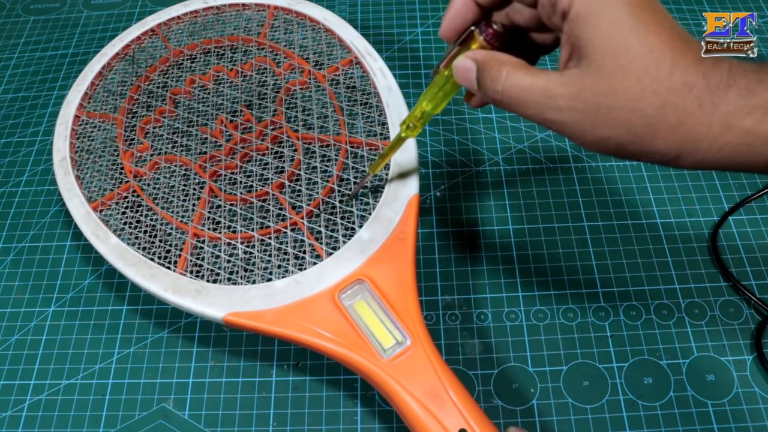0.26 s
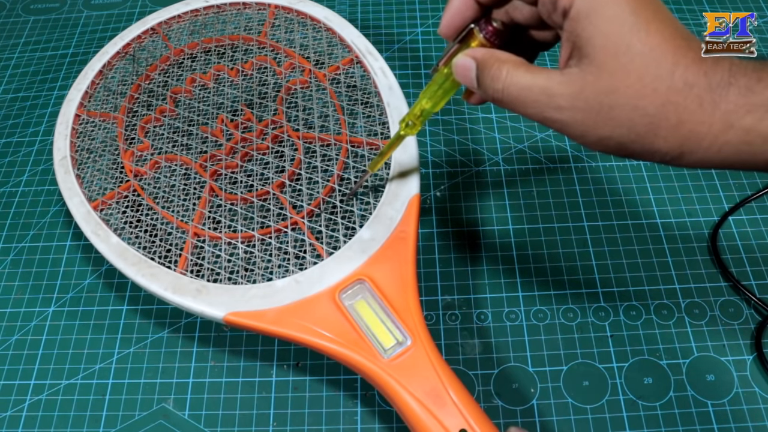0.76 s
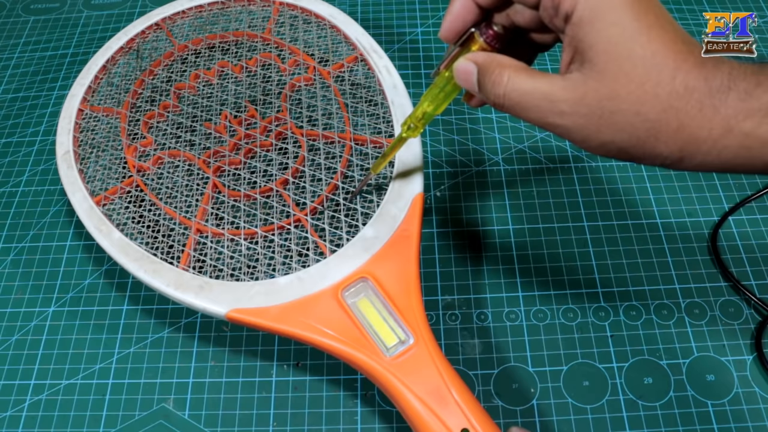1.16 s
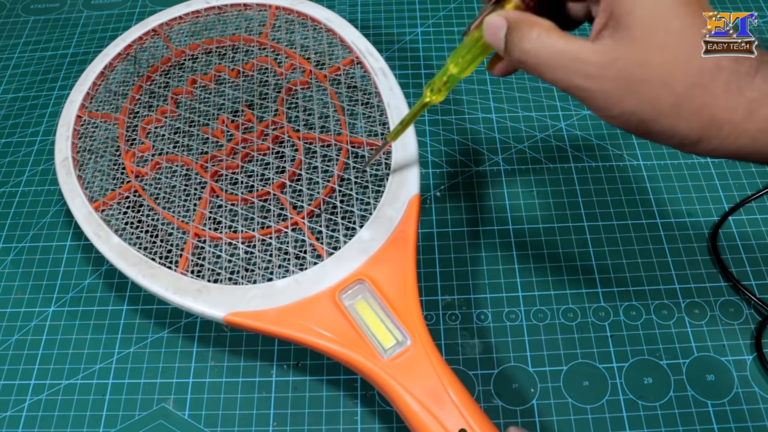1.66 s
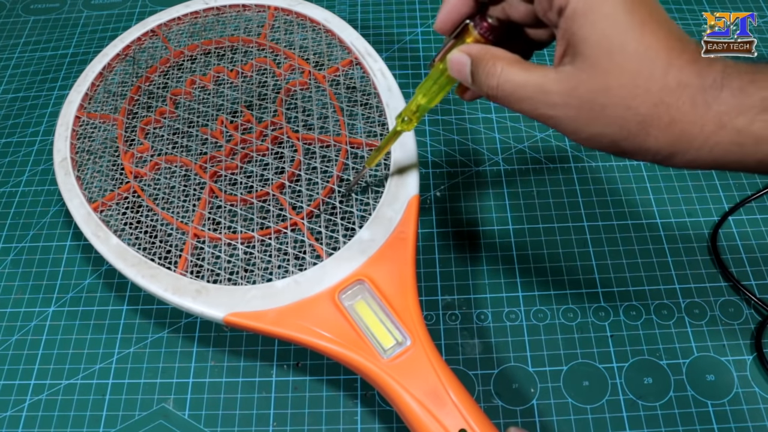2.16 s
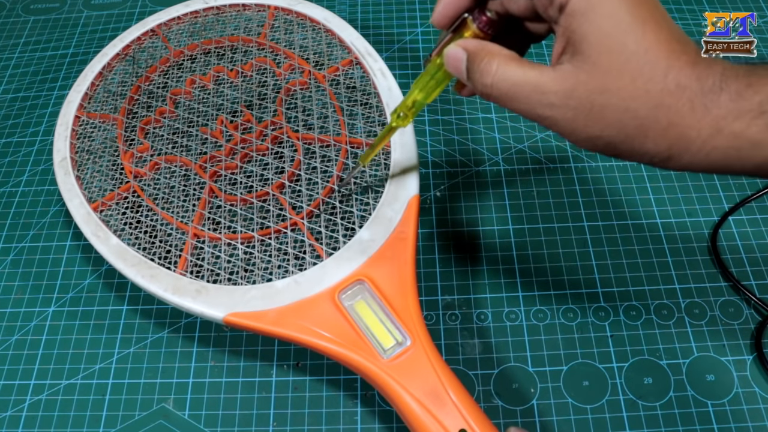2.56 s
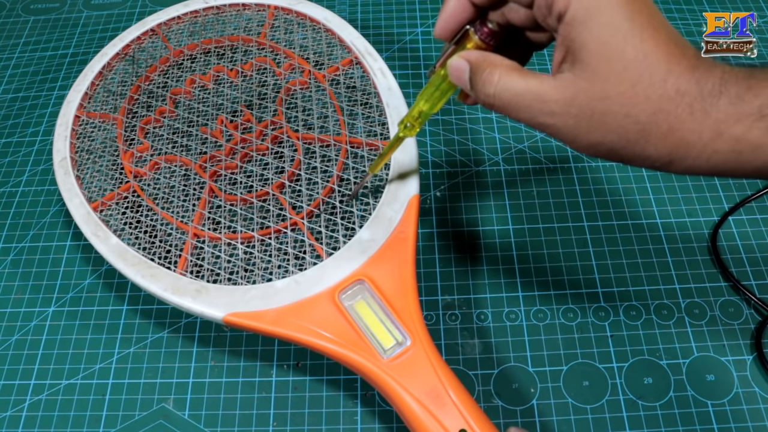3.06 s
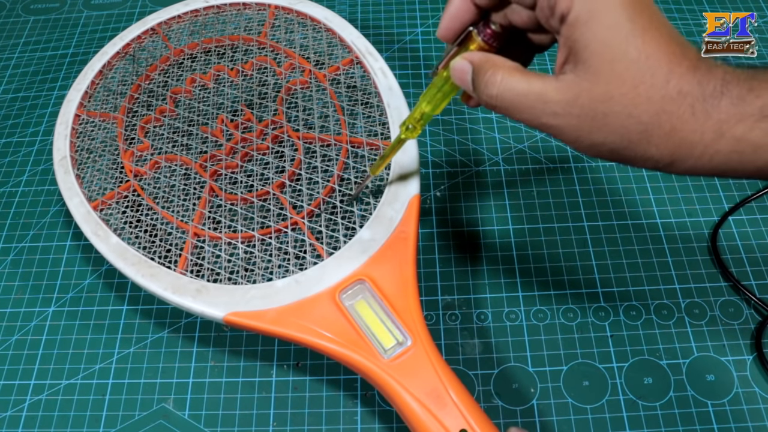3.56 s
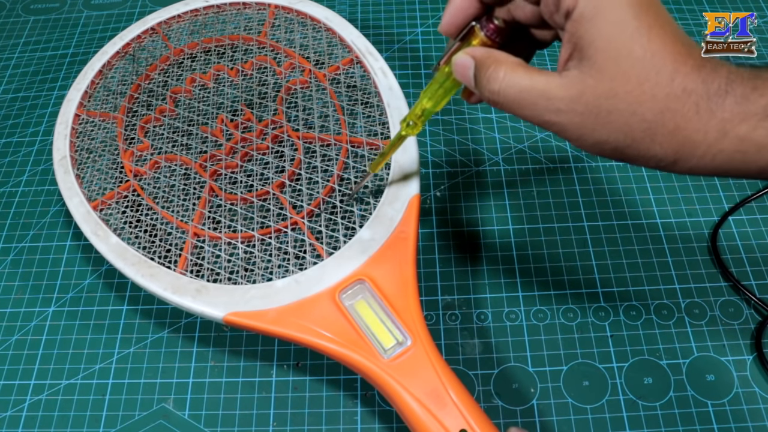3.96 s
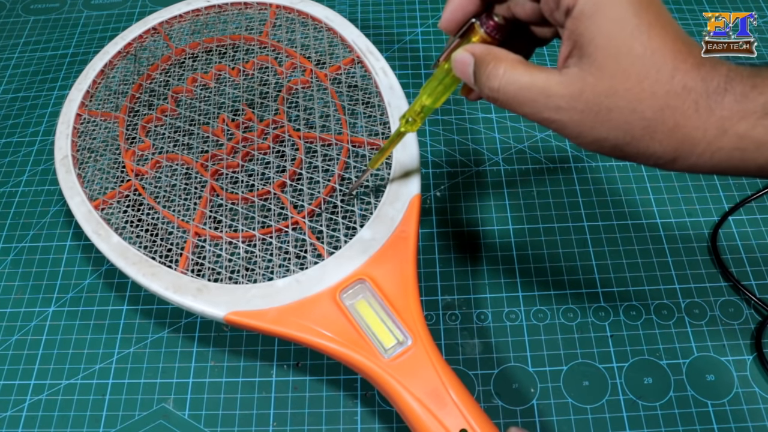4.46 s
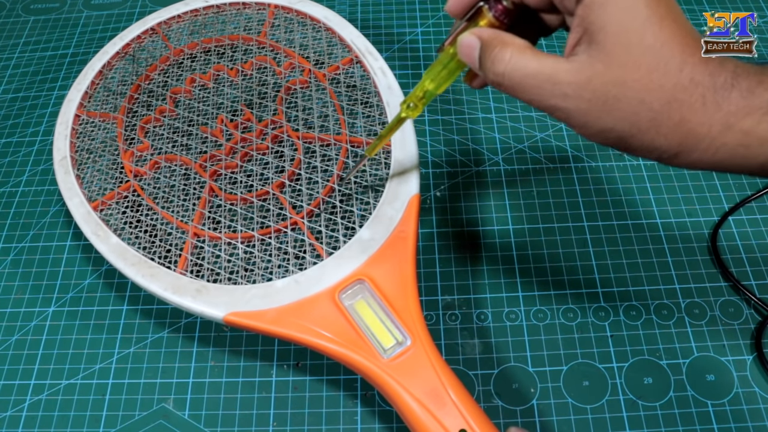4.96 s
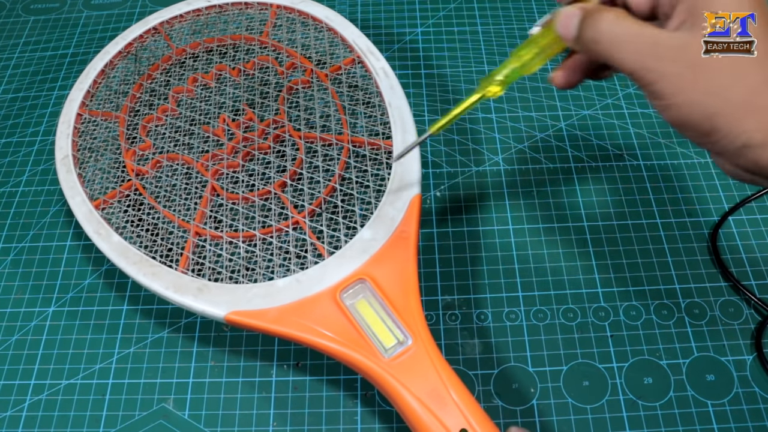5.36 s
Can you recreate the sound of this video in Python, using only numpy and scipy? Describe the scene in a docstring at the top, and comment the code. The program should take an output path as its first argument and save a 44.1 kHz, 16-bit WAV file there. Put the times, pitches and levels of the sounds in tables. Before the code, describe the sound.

An electric mosquito swatter snaps with loud single sparks and a quick crackling run as a screwdriver touches its mesh in a small room.

```python
"""A small bare room, a stereo microphone close to the charged mesh of an electric mosquito swatter.
A spark's tail dies away over low rumble, a far drone and hiss. A screwdriver tip ticks on the mesh and
shorts it at 0.5 s and 1.1 s: each spark is a pressure pop and a bright crack that overload the recorder,
whose limiter ducks and lets the room tail up. A run of small sparks follows until 1.4 s; the level sags
and slowly returns. Single sparks come at 2.5, 3.2 and 3.7 s, and a last cluster of three at 4.9 s."""
import sys
import numpy as np
from scipy import signal
from scipy.fft import rfft, irfft, next_fast_len
from scipy.io import wavfile
from scipy.ndimage import uniform_filter1d

SR = 44100
rng = np.random.default_rng(int(sys.argv[2]) if len(sys.argv) > 2 else 0)


def persist_wave(psi):
    """Save psi, clipped to +-1, as 16-bit WAV."""
    counts = np.round(np.clip(psi, -1, 1) * 32767).astype(np.int16)
    wavfile.write(sys.argv[1], SR, np.atleast_2d(counts).T)


N = 247392
LEAD = 4410   # samples before t = 0, where the first spark falls
LENGTH = N + LEAD
TIME = (np.arange(LENGTH) - LEAD) / SR


def amp(db):
    """Decibels to gain."""
    return 10 ** (np.asarray(db) / 20)


def rms_one(x):
    """Scale to rms 1."""
    return x / np.sqrt(np.mean(x ** 2) + 1e-20)


def in_time(rows):
    """Columns of a curve, one value per sample."""
    times, *columns = np.transpose(rows)
    return [np.interp(TIME, times, column) for column in columns]


def at_hz(points, hz, column=1):
    """Read a table on a log-frequency axis."""
    points = np.array(points)
    return np.interp(np.log(hz), np.log(points[:, 0]), points[:, column])


def sample_of(s):
    """Sample index of a time."""
    return round(s * SR) + LEAD


def add_at(out, s, sound):
    """Mix a stereo sound in at a time."""
    start = sample_of(s)
    out[:, start:start + sound.shape[1]] += sound


def butter(x, hz, kind="low", order=2):
    """Butterworth filter."""
    return signal.sosfilt(signal.butter(order, hz, kind, fs=SR, output="sos"), x)


def resonance(x, hz, width_hz):
    """Two-pole resonance."""
    r = np.exp(-np.pi * width_hz / SR)
    return signal.lfilter([1 - r, 0, r - 1], [1, -2 * r * np.cos(2 * np.pi * hz / SR), r * r], x)


def double_resonance(x, hz, width_hz):
    """Two equal resonances in series; rms 1."""
    return rms_one(resonance(resonance(x, hz, width_hz), hz, width_hz))


def pan(x, pan_db):
    """Spread a left-right difference over two channels."""
    return x * amp([[pan_db / 2], [-pan_db / 2]])


def swell(middle_s, length_s):
    """Bell-shaped swell."""
    return np.exp(-(2 * (TIME - middle_s) / length_s) ** 2)


# How alike the microphone's two sides hear the room: f/Hz, correlation
LIKENESS = [(60, 0.79), (380, 0.78), (950, 0.48), (2400, 0.017)]

def stereo_noise(spectrum):
    """Noise of a given spectrum whose channels are alike in the bass only; rms 1."""
    size = next_fast_len(LENGTH)
    hz = np.maximum(np.fft.rfftfreq(size, 1 / SR), 1)
    mid, side = rfft(rng.standard_normal((2, size)))
    alike = np.clip(at_hz(LIKENESS, hz), 0, 1)
    both = np.sqrt(1 + alike) * mid + np.sqrt(1 - alike) * side * [[1], [-1]]
    return rms_one(irfft(both * amp(at_hz(spectrum, hz)), size)[:, :LENGTH])


# A drone, far off: middle t/s, length/s, f/Hz, glide/(Hz/s), level/dB, octave level/dB
DRONE_SWELLS = [(2.896, 0.28, 365.3, -24, -64, -74), (4.584, 0.25, 393, 32, -62.5, -78)]

def far_drone():
    """A gliding tone and its octave swell twice, wavering with slow noise."""
    waver = rms_one(butter(rng.standard_normal((2, LENGTH)), hz=22))
    tone_gain, octave_gain = np.sqrt(2) * (1 + .5 * waver)
    out = 0
    for s, length, hz, glide, level_db, octave_db in DRONE_SWELLS:
        phase = 2 * np.pi * (hz * TIME + glide * (TIME - s) ** 2 / 2)
        tone = amp(level_db) * tone_gain * np.sin(phase)
        octave = amp(octave_db) * octave_gain * np.sin(2 * phase)
        out = out + swell(s, length) * (tone + octave)
    return out


# Spectra of the room tone's low, middle and high layers: f/Hz, relative density/dB
RUMBLE = [(15, -35), (25, -6.5), (48, -6.5), (76, -13), (102, 5), (167, -12), (250, -1), (320, -22.5),
          (550, -120)]
MURMUR = [(88, -42), (150, -9), (306, -8.5), (360, 3), (441, -8), (495, -12.5), (595, -4.5), (1500, -13.5),
          (1950, -35.5), (3300, -120)]
HISS = [(530, -30.5), (900, -10.5), (1340, -5.5), (1440, -4.5), (2180, -4), (2810, -5.5), (4300, -3),
        (6490, -10), (14600, -12.5), (16300, -15.5)]
# Their levels at the microphone: t/s, rumble/dB, murmur/dB, hiss/dB
ROOM_TONE_LEVELS = [(0, -64, -65.5, -63), (.45, -58.5, -63.5, -62.5), (1.0, -62.5, -62.5, -62),
                    (1.5, -77.5, -65, -58.5), (2.0, -77, -62.5, -62.5), (2.45, -67, -61.5, -61),
                    (2.85, -87.5, -71, -70.5), (3.1, -76.5, -68, -67.5), (3.6, -85, -69.5, -66.5),
                    (4.1, -72.5, -68, -67), (4.75, -66, -68, -70), (5.15, -68, -68, -62),
                    (5.25, -95, -71.5, -67), (5.6, -84, -67.5, -68)]

def room_tone():
    """Rumble, murmur and hiss drift in level; a hum and a narrow band ride with the hiss."""
    white = stereo_noise([(20, 0), (20000, 0)])
    band = double_resonance(white, hz=4250, width_hz=230)
    hum = np.sqrt(2) * np.sin(2 * np.pi * 503 * np.arange(LENGTH) / SR)
    hiss = stereo_noise(HISS) + amp(-12) * (band + hum)
    rumble_gain, murmur_gain, hiss_gain = amp(in_time(ROOM_TONE_LEVELS))
    return rumble_gain * stereo_noise(RUMBLE) + murmur_gain * stereo_noise(MURMUR) + hiss_gain * hiss


# Faint rustles in the room: middle t/s, length/s, f/Hz, width/Hz, level/dB
RUSTLES = [(2.219, 0.29, 7800, 405, -71.5), (3.052, 0.4, 5500, 800, -74), (3.638, 0.14, 5000, 1470, -81)]

def rustles():
    """Narrow bands of high noise swell and fade."""
    white = rng.standard_normal((2, LENGTH))
    return sum(amp(level_db) * swell(s, length) * rms_one(resonance(white, hz, width_hz))
               for s, length, hz, width_hz, level_db in RUSTLES)


# The tip on the mesh, close by: t/s, level/dB, f/Hz, width as a share of f, t60/s
TIP_TICKS = [(0.4826, -43, 3200, .5, .2), (0.847, -44, 12000, .7, .05), (1.0328, -38, 4000, .9, .07),
             (1.4408, -18, 2990, .3, .15), (2.7143, -35, 3100, .8, .09), (3.6994, -44, 3100, .6, .2),
             (4.2787, -44, 3250, .5, .25), (4.3844, -47, 3600, .6, .13), (5.1205, -51, 2840, .45, .2)]

def mesh_ticks():
    """The tip lands with a sharp white touch and the mesh rattles briefly in a broad resonance."""
    touch_t60 = .012
    out, t = np.zeros((2, LENGTH)), np.arange(12000) / SR
    for s, level_db, hz, share, t60 in TIP_TICKS:
        white = rng.standard_normal((2, len(t)))
        rattle = double_resonance(white, hz, share * hz) * amp(-7 - 60 * t / t60)
        touch = white * amp(-6 - 60 * t / touch_t60)
        add_at(out, s, amp(level_db) * (rattle + touch))
    return out


# The bare room's answer to a crack: f/Hz, early density/dB, early t60/s, late density/dB, late t60/s
ROOM_DECAY = [(70, -10, 0.15, -55.5, 0.13), (200.3, -8, 0.033, -51, 0.8), (318, -7.5, 0.13, -34, 0.12),
              (530, -6.5, 0.11, -29, 0.32), (930, 3.5, 0.058, -26.5, 0.31), (2150, 0.5, 0.089, -22, 0.3),
              (4100, -0.5, .052, -17, 0.28), (7440, -8, 0.17, -20, 0.29), (11500, -8, 0.16, -18, 0.26),
              (15000, 1.5, 0.084, -16, 0.25)]

def room_cracks(sparks):
    """Cracks feed power into the room: noise dying band by band in an early and a late part."""
    lag_s = .00022   # the crack follows the pop
    power = np.full(LENGTH, 1e-18)
    for s, _, crack_db, *_ in sparks:
        power[sample_of(s + lag_s)] = amp(crack_db) ** 2
    edges_hz = 50 * 2 ** np.arange(0, 8.6, .5)   # half octaves
    white, out = rng.standard_normal((2, 2, LENGTH)), 0
    for k, (low, high) in enumerate(zip(edges_hz, edges_hz[1:])):
        band = butter(white[k % 2], [low, high], "band")
        centre_hz = np.sqrt(low * high)
        early_db, early_t60, late_db, late_t60 = (at_hz(ROOM_DECAY, centre_hz, c) for c in range(1, 5))
        early = signal.lfilter([amp(2 * early_db)], [1, -amp(-120 / (early_t60 * SR))], power)
        late = signal.lfilter([amp(2 * late_db)], [1, -amp(-120 / (late_t60 * SR))], power)
        out = out + band * np.sqrt(early + late)
    return out


# Surfaces near the swatter, levels relative:
# delay/ms, pop left/dB, pop right/dB, scatter left/dB, scatter right/dB, scatter length/ms
NEAR_SURFACES = [(3.65, 1.5, -1, -6, -5.5, 0.88), (6.5, -9, -24, -5, -11, 1.6),
                 (10.0, -7, -24.5, -2.5, -14, 3.5), (14.5, -13.5, -23.5, -11, -18.5, 16)]

def near_echoes(pop, pop_db, rise_ms):
    """Yield (delay in s, echo): each surface returns the pop dulled, with mid-band scatter."""
    t_ms = np.arange(pop.shape[1]) * 1000 / SR
    echo_db = -15.5 + 3 * np.log2(rise_ms / .075)   # a fatter spark rises more slowly and echoes more
    scatter_strength = amp(pop_db - 8) * min(rise_ms / .17, 1)
    dull_pop = butter(pop, hz=5070)
    white = rng.standard_normal((len(NEAR_SURFACES), 2, len(t_ms)))
    facets = rms_one(butter(white, (436, 4450), "band"))
    for (delay_ms, *levels_db, length_ms), facet in zip(NEAR_SURFACES, facets):
        pop_gain, scatter_gain = amp(echo_db + np.reshape(levels_db, (2, 2, 1)))
        scatter = scatter_strength * facet * np.exp(-(t_ms / length_ms) ** 2)
        yield delay_ms / 1000, pop_gain * dull_pop + scatter_gain * scatter


def pressure_pop(rise_ms, swing_ms):
    """A spark's short push on the air, swung negative by a bass cut, sooner on the right; peak 1."""
    t_ms = np.arange(1500) * 1000 / SR
    push = t_ms / rise_ms * np.exp(-t_ms / rise_ms)
    swung = np.array([butter(push, 1000 / ms, "high") for ms in (swing_ms, .88 * swing_ms)])
    pop = butter(swung, hz=9000)
    return pop / pop.max()


# Sparks near the microphone: t/s, pop peak/dB, crack level/dB, left over right/dB, rise/ms, swing/ms
SPARKS = [(-0.035, -21, 24.5, 8, 0.067, 4.5), (0.5383, 10, 24.5, -7, 0.15, 8.5),
          (1.0654, 13, 23, 7.5, 0.13, 8), (1.1026, 1.5, 6, -15, 0.093, 8.5),
          (1.118, -4, -4.5, 9.5, 0.047, 9), (1.1246, -12.5, 0.5, 17.5, 0.067, 9),
          (1.235, -10.5, 4, -6, 0.043, 3.4), (1.2443, -5.5, 6, 6.5, 0.052, 2.9),
          (1.2563, -3, 9.5, 6.5, 0.05, 2.5), (1.2703, -1, 12.5, 11, 0.043, 3.4),
          (1.289, 3, 10.5, -2.5, 0.037, 3.4), (1.3071, -5.5, 10, 12.5, 0.068, 3.9),
          (1.325, -4.5, 3, 13, 0.033, 1.9), (1.3466, 0.8, 8, 9.5, 0.038, 3.2), (1.371, 1, 6, 6, 0.037, 4.3),
          (2.535, 9, 18.5, 4.5, 0.15, 5), (3.1855, 9.5, 20.5, -1, 0.17, 6.04),
          (3.7496, 9, 18, -4, 0.16, 4.66), (4.8647, 8.5, 17, 1, 0.18, 7.9), (4.9076, 1, 5, 9, 0.08, 12),
          (4.931, -8.5, -4.5, -10, 0.066, 14)]

def swatter_sparks():
    """The tip shorts the charged mesh; returns the pops with their echoes, and the cracks."""
    pops = np.zeros((2, LENGTH))
    for s, pop_db, _, pan_db, rise_ms, swing_ms in SPARKS:
        pop = amp(pop_db) * pressure_pop(rise_ms, swing_ms)
        add_at(pops, s, pan(pop, pan_db))
        for delay_s, echo in near_echoes(pop, pop_db, rise_ms):
            add_at(pops, s + delay_s, echo)
    return pops, room_cracks(SPARKS)


def limiter(x, pops, limit_db=-18, attack_ms=.64, release_db_per_s=165.5):
    """The recorder's gain ducks under loud sound or a pop, then climbs back at a steady dB rate."""
    sensed_pops = amp(18.5) * np.tanh(pops / amp(-30.5))   # the sensor overloads: loud pops read alike
    power = uniform_filter1d(np.mean(x ** 2 + sensed_pops ** 2, axis=0), size=45, origin=22)
    excess_db = np.maximum(10 * np.log10(power.clip(1e-12)) - limit_db, 0)
    climb_db = release_db_per_s * np.arange(LENGTH) / SR
    cut_db = np.maximum.accumulate(excess_db + climb_db) - climb_db
    r = np.exp(-1000 / (attack_ms * SR))
    return x * amp(-signal.lfilter([1 - r], [1, -r], cut_db))


# After the long run of sparks, all but the pops sags and slowly comes back: t/s, gain/dB
SAG = [(1.38, 5), (1.5, 2), (1.62, -18), (1.9, -10), (2.1, -5.5), (2.45, -3.5), (2.55, 10.5)]

def scene():
    """The pops set the limiter off but are too quick to be held; it holds all the rest."""
    pops, cracks = swatter_sparks()
    air = cracks + mesh_ticks() + rustles() + pan(room_tone() + far_drone(), pan_db=1)
    sag_gain = amp(in_time(SAG)[0])
    return (sag_gain * limiter(air, pops) + pops)[:, LEAD:]


def record(dry):
    """The recorder clips near full scale, then cuts the deep bass and the top."""
    bass_cut_hz, top_cut_hz = 140, 15900
    clipped = np.clip(dry, -.97, .97)
    thinned = butter(clipped, bass_cut_hz, "high", order=1)
    return signal.sosfilt(signal.ellip(10, .5, 65, top_cut_hz, fs=SR, output="sos"), thinned)


dry = scene()
out = record(dry)
persist_wave(out)
```